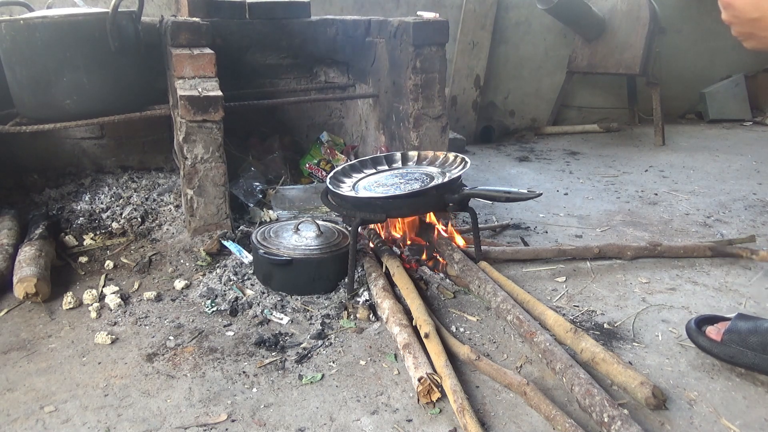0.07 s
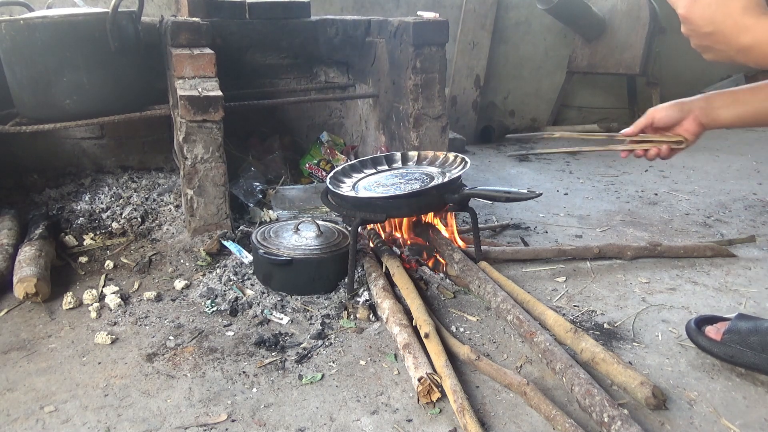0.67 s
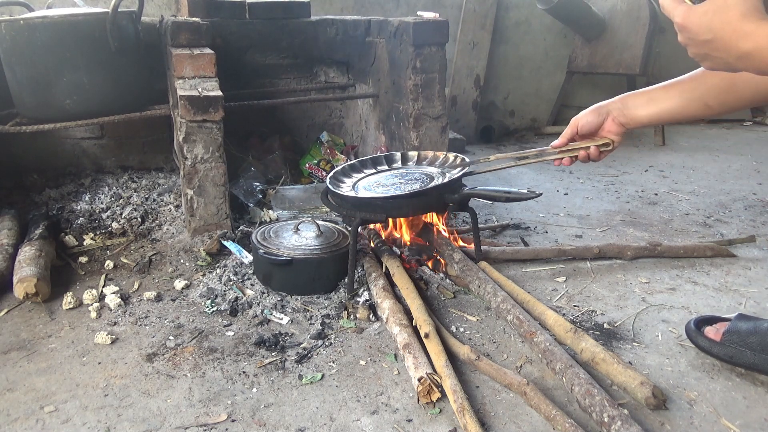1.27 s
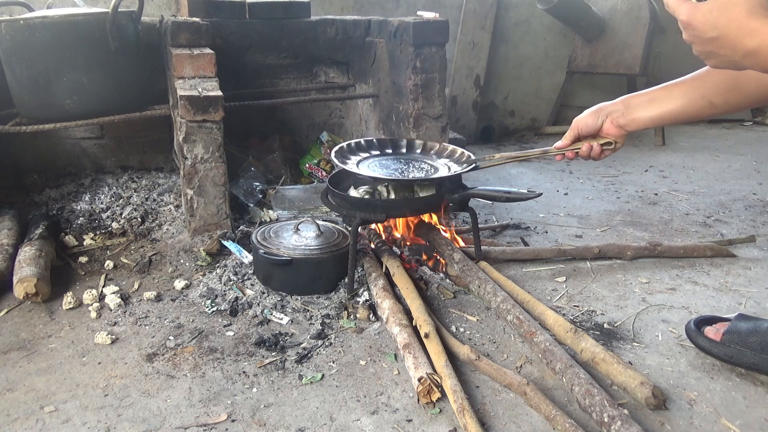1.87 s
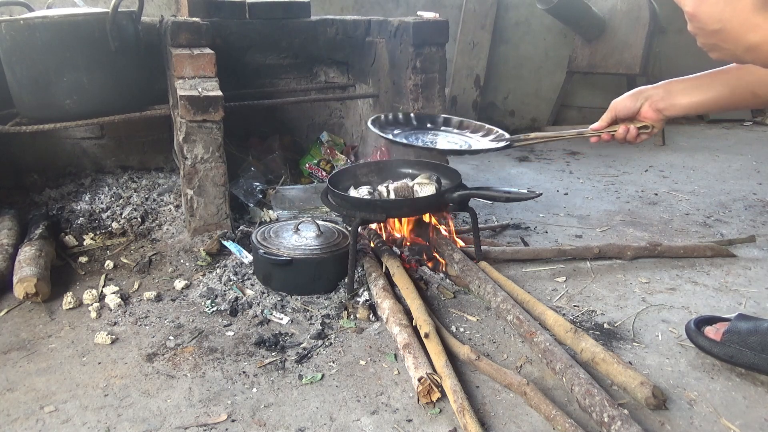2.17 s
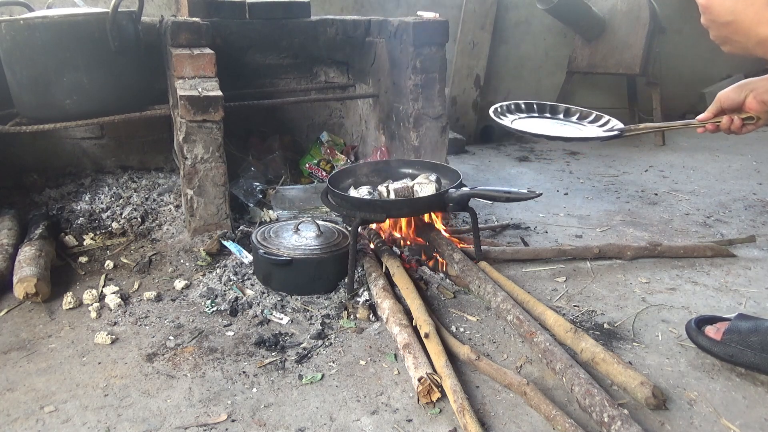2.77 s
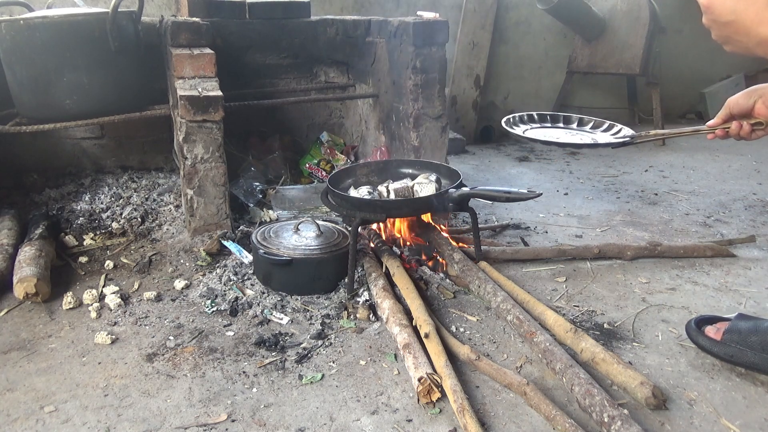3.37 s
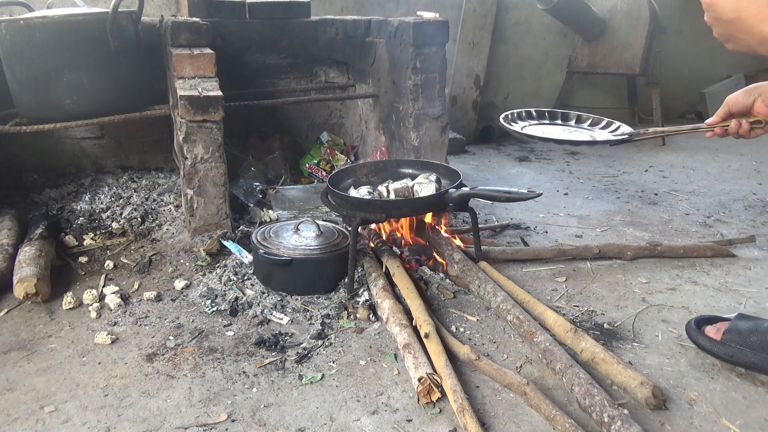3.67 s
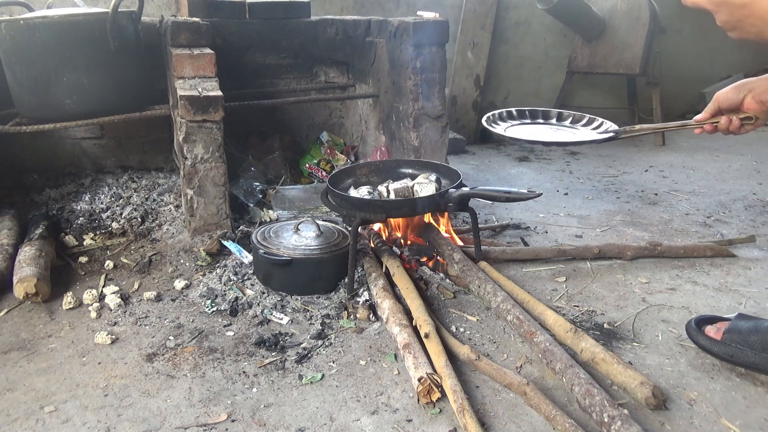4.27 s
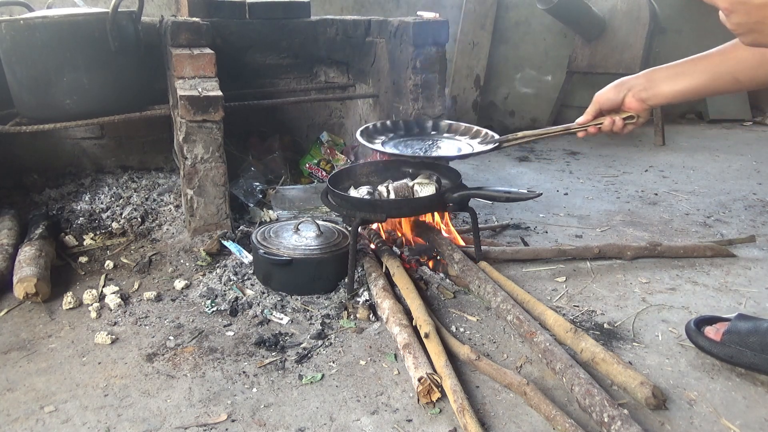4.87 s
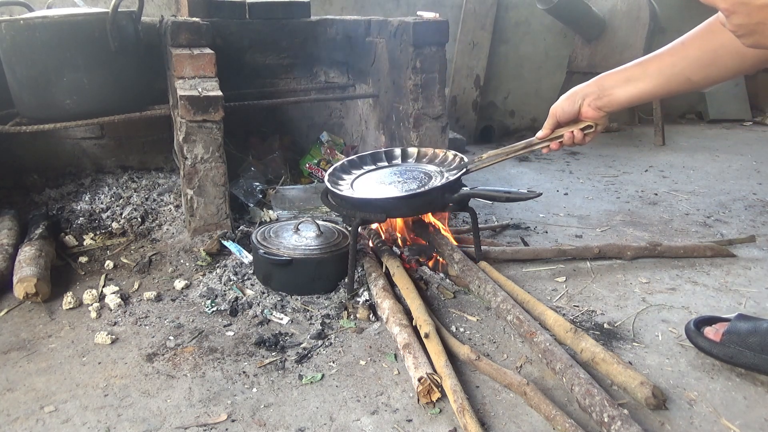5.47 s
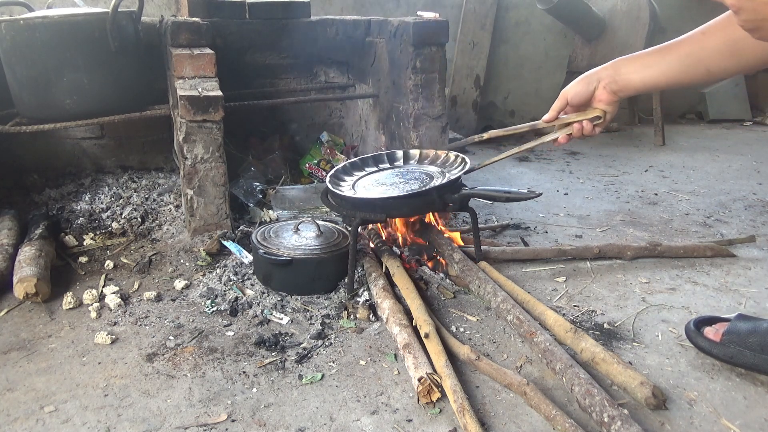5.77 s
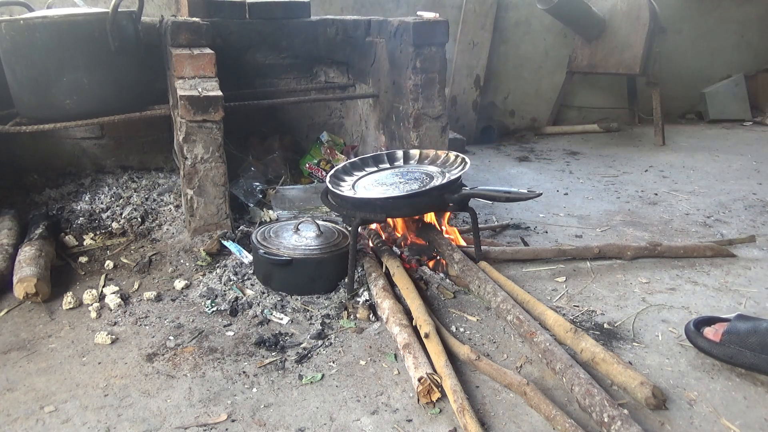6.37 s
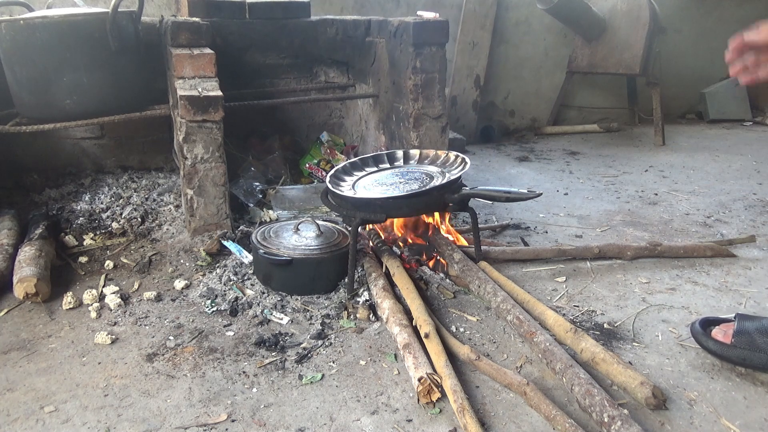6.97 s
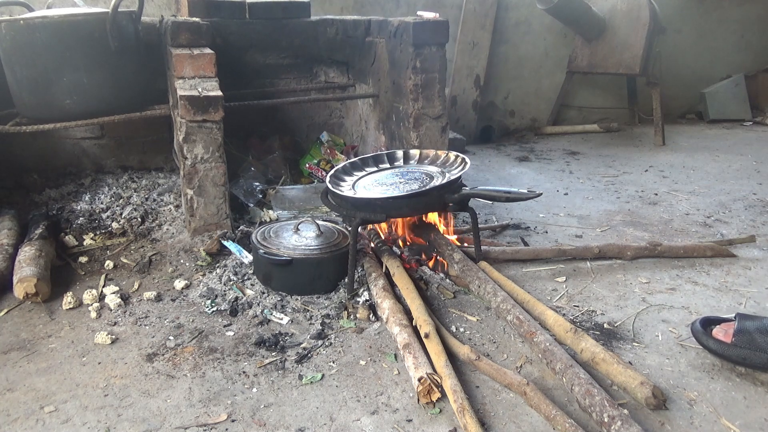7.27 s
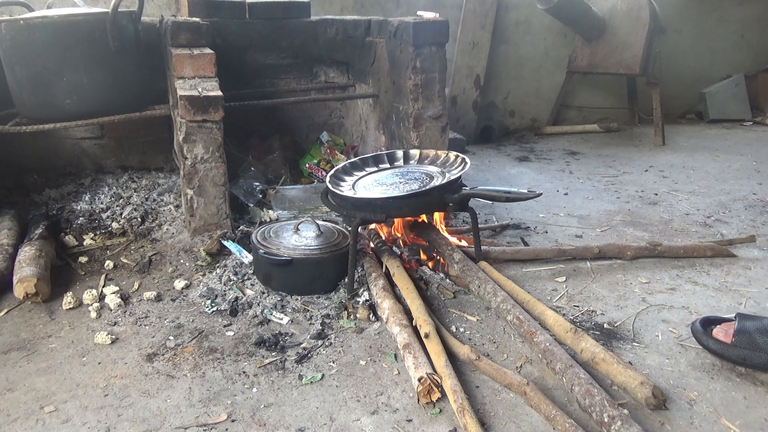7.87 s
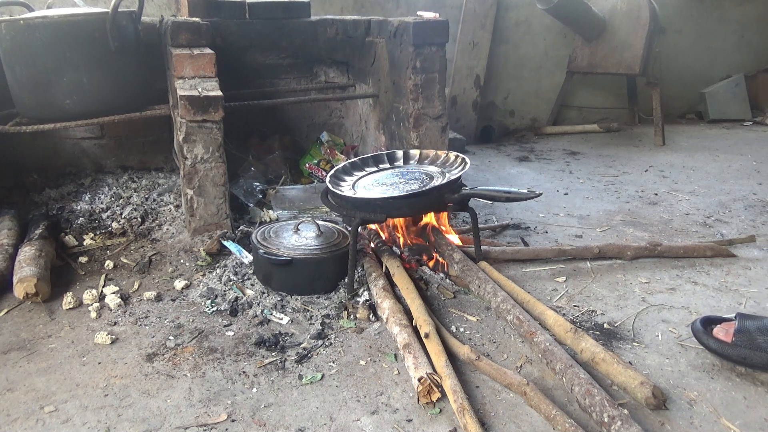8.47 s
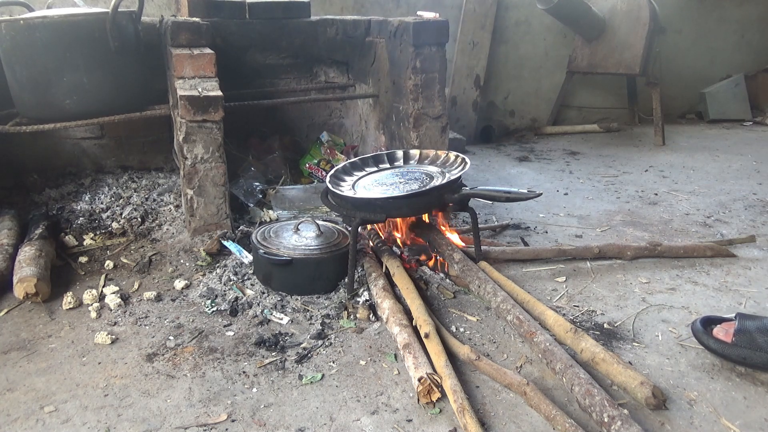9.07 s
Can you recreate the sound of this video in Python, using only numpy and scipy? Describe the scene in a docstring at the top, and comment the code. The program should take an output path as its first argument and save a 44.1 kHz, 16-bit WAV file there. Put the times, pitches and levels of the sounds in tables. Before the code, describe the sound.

In a yard, a bright, steady frying hiss is heard from nearby, with sharp spits of oil and the faint murmur and snaps of burning wood. The sizzle opens up as the pan is uncovered, then eases and turns hollow when the enamel lid lands with a couple of ringing clanks. Wooden tongs drop to the ground, and soft knocks and thuds follow while the frying continues.

```python
"""Food fries in a pan: steam bubbles burst and ring, water drops spit in the oil. Tongs lift the enamel
plate that serves as a lid and the sizzle opens up; the plate clanks back and the hiss rings again in the
hollow beneath it. The wooden tongs clatter to the ground. The wood fire under the pan murmurs and snaps.
Dull knocks and thuds nearby, faint drones far off, a short echo from the yard walls."""
import sys
import numpy as np
from scipy import signal
from scipy.fft import rfft, irfft, next_fast_len
from scipy.io import wavfile
from scipy.ndimage import map_coordinates

SR = 44100
rng = np.random.default_rng(int(sys.argv[2]) if len(sys.argv) > 2 else 0)


def int16_out(signal):
    """Quantize to a 16-bit WAV file."""
    q = np.round(np.clip(np.atleast_2d(signal).T, -1, 1) * 32767)
    wavfile.write(sys.argv[1], SR, q.astype(np.int16))


N = 407043
TIME_S = np.arange(N) / SR
FFT_SIZE = next_fast_len(N + SR)
GRID_HZ = np.fft.rfftfreq(FFT_SIZE, 1 / SR)
TOP_HZ = 15780

# Yard decay (frequency [Hz], t60 [s])
YARD_DECAY = [(200, 0.28), (2000, 0.083), (10000, 0.022)]
# Echo colour (frequency [Hz], gain [dB])
ECHO_SPECTRUM = [(30, -33), (120, -24.5), (300, -15), (1000, -7.5), (2000, -11.5), (6000, -19.5),
                 (10000, -12.5), (12000, -33.5)]
# Far drones (start [s], end [s], frequency [Hz], width [Hz], level [dB])
DRONES = [(-1, 10, 137.2, 20, -57.5), (-1, 10, 104, 4.8, -61), (-1, 10, 381, 8.3, -61),
          (1.37, 2.15, 104, 6, -54), (1.2, 1.93, 762, 36, -52)]
# Soft thuds (time [s], level [dB], frequency [Hz], length [s])
THUDS = [(.76, -44.5, 191, 0.09), (3.329, -44, 430, 0.073), (5.08, -47.5, 190, 0.14),
         (6.707, -44, 233, 0.085), (7.219, -35.5, 132, 0.051), (7.225, -43, 236, 0.081),
         (7.25, -45, 101, .06)]
# Wood impacts: nearby knocks, dropped tongs (time [s], level [dB], t60 [s])
KNOCKS = [(3.168, -34, 0.15), (6.74, -43, 0.37), (7.669, -30, 0.17), (7.683, -30, 0.24),
          (8.11, -34.5, 0.22)]
TONG_HITS = [(6.673, -19, 0.08), (6.685, -17.5, 0.16), (6.702, -19.5, 0.098), (6.716, -23.5, 0.42),
             (6.7935, -20.5, 0.15)]
# Spectra: knocked wood, tongs, flames, scraped rim (frequency [Hz], relative density [dB])
KNOCK_SPECTRUM = [(40, -40), (100, -21), (200, -7), (480, -6), (670, 3.5), (880, -10.5), (1100, 0),
                  (1350, -13), (1650, -3), (2700, -13), (3550, -9), (4500, -26), (9000, -34)]
TONG_SPECTRUM = [(150, -27), (700, -18), (2200, -10.5), (3000, -2), (3600, -6.5), (4500, 1), (6000, -4),
                 (8000, -5), (14000, -34)]
FLAME_SPECTRUM = [(20, -27), (50, -9), (70, -7), (105, -9), (135, -8.5), (165, -0.5), (230, -0.5), (400, 1),
                  (700, 1), (1100, -5), (2500, -7), (8000, -59)]
RIM_SPECTRUM = [(50, -40), (150, -18), (400, -21), (1000, -1), (2000, 10), (3800, 2), (5200, 12.5),
                (7000, -11), (14000, -25)]
# Firewood snaps (time [s], level [dB], frequency [Hz], width [Hz], t60 [s])
SNAPS = [(2.164, -16, 3880, 3000, 0.025), (3.165, -23, 2300, 3200, 0.14), (3.476, -17.5, 4970, 2000, 0.036),
         (3.598, -20, 3600, 2500, 0.075), (3.699, -19, 4000, 1500, 0.13), (4.495, -22, 2110, 1000, 0.027),
         (6.635, -22, 1810, 500, 0.024), (8.651, -26, 1840, 450, .04)]
# Lid landing and rocking to rest (time [s], ring level [dB], scrape level [dB])
LID_CONTACTS = [(5.205, -26, -20), (5.217, -25, -27), (5.228, -26, -27), (5.29, -40, -42),
                (5.488, -27, -22.5), (5.497, -31, -38), (5.544, -40, -37)]
# Enamel plate modes (frequency [Hz], relative level [dB], t60 [s])
LID_MODES = [(338, -10, 0.15), (370, -15, 0.2), (696, -3.5, 0.15), (736, -1, 0.23), (1037, 1.5, 0.21),
             (1136, -8.5, 0.14), (1283, -6, 0.09), (1670, 4, 0.11), (1731, -7, 0.2), (2088, -2, 0.22),
             (2830, -5, 0.11), (3275, -8, 0.34), (4700, -17, .11), (4915, -1, 0.14)]
# Loudest oil spits (time [s], level [dB], frequency [Hz], width [Hz])
SPITS = [(2.258, -10, 9000, 4000), (2.934, -11, 9000, 4000), (4.863, -10.5, 9400, 1300),
         (5.792, -13, 5800, 1600), (5.914, -13, 10100, 1200), (6.067, -14, 5800, 1200),
         (6.151, -12.5, 8400, 3500), (7.221, -12, 10000, 900), (7.876, -13, 9800, 1500),
         (7.907, -15.5, 9000, 2500), (8.449, -14, 9800, 1200), (8.520, -14.5, 6300, 1600)]
# Sizzle swells as the lid lifts and before it lands, then eases slightly (time [s], level change [dB])
SIZZLE_SHIFTS = [(1.72, 1.14), (4.74, 1.5), (5.68, -0.23)]
# Sizzle spectra, lid off and on (frequency [Hz], relative density [dB])
OPEN_SPECTRUM = [(200, -44), (900, -23), (1400, -13.5), (2050, -9), (2650, -11), (3400, -7), (4600, -7.5),
                 (5700, -2), (7000, -5), (8200, -4.5), (9200, 0.5), (10000, -0.5), (11000, -8),
                 (12500, -14), (16000, -17.5)]
COVERED_SPECTRUM = [(200, -29.5), (900, -23.5), (1800, -14.5), (2750, -17.5), (4400, -15.5), (5200, -9.5),
                    (5850, -3.5), (6850, -6.5), (7750, -1.5), (8550, -6), (9300, -0.6), (10100, 0),
                    (11000, -7.5), (12400, -14.5), (16000, -19.5)]
# Air modes under the lid, per seating (frequency [Hz], width [Hz], relative level [dB])
FIRST_AIR_MODES = [(714, 100, -14), (1220, 190, -12), (1907, 150, -5), (2400, 73, -7.5), (3200, 120, -10),
                   (3760, 210, -9.5), (4230, 160, -10.5), (4960, 160, -9), (6000, 200, -7),
                   (7790, 360, -8.5)]
LANDED_AIR_MODES = [(673, 85, -10), (1060, 62, -8), (1676, 110, -5), (2110, 250, -7), (2680, 50, -10.5),
                    (3070, 55, -8), (3840, 170, -8.5), (5600, 430, -0.5), (9200, 220, -2)]
SETTLED_AIR_MODES = [(705, 58, -9.5), (1046, 23, -11), (1174, 69, -11), (1835, 265, -8), (2284, 54, -4.5),
                     (3090, 160, -13.5), (3560, 76, -7), (4070, 80, -6.5), (5800, 430, -2),
                     (7700, 160, -9.5)]

WEDGE_S, LIFT_S, LID_AWAY_S, LAND_S, SETTLE_S = 0.86, 1.69, 3.5, 5.23, 6.75  # lid timeline
TREBLE_TAU_S, LOW_TAU_S = 0.11, 0.23  # gap opening, per band


def amp(db):
    """Decibels to gain."""
    return 10 ** (np.asarray(db) / 20)


def unit(x):
    """Scale to rms 1."""
    return x / np.sqrt(np.mean(x ** 2) + 1e-20)


def along(points, hz=GRID_HZ):
    """Interpolate (frequency [Hz], value) points on a log axis."""
    knots_hz, values = np.transpose(points)
    return np.interp(np.log(hz + 1), np.log(knots_hz + 1), values)


def wobble(rate_hz):
    """Smooth random curve, rate_hz knots a second."""
    return map_coordinates(rng.standard_normal(int(N * rate_hz / SR) + 4), [TIME_S * rate_hz])


def swell(start_s, rise_s, tau_s):
    """Linear rise to 1, exponential decay."""
    age_s = TIME_S - start_s
    return np.clip(age_s / rise_s, 0, 1) * np.exp(-np.maximum(age_s - rise_s, 0) / tau_s)


def resonance(centre_hz, width_hz, hz=GRID_HZ):
    """Resonator gain, 1 at the centre."""
    return np.abs(hz * width_hz / (centre_hz ** 2 - hz ** 2 + 1j * hz * width_hz))


def filtered(x, response):
    """Apply a frequency response given on GRID_HZ."""
    return irfft(rfft(x, FFT_SIZE) * response, FFT_SIZE)[..., :N]


def coloured(x, gain):
    """Minimum-phase filter, gain on GRID_HZ."""
    cepstrum = irfft(np.log(np.maximum(gain, 1e-6)), FFT_SIZE)
    cepstrum[1:FFT_SIZE // 2] *= 2
    cepstrum[FFT_SIZE // 2 + 1:] = 0
    return filtered(x, np.exp(rfft(cepstrum)))


def burst(gain_at, t60_s, attack_s=0.0003):
    """0.5 s of decaying noise with spectrum gain_at(hz)."""
    t = TIME_S[:SR // 2]
    gain = gain_at(np.fft.rfftfreq(len(t), 1 / SR))
    noise = irfft(rfft(rng.standard_normal(len(t))) * gain, len(t))
    return unit(noise) * amp(-60 * t / t60_s) * (1 - np.exp(-t / attack_s))


def band_burst(centre_hz, width_hz, t60_s):
    """Noise burst through two equal resonators."""
    return burst(lambda hz: resonance(centre_hz, width_hz, hz) ** 2, t60_s)


def add(track, time_s, sound):
    """Mix a sound in at time_s."""
    part = track[round(time_s * SR):]
    part[:len(sound)] += sound[:len(part)]


def yard_echo(x, blocks=32, delay_s=0.004):
    """Diffuse wall echo, shorter in the treble; its pattern drifts as the bubbles move about."""
    out, hop = np.zeros(N), N // blocks
    for start in range(-hop, N, hop):
        hz, _, noise = signal.stft(rng.standard_normal(SR // 3), SR, nperseg=256)
        t = np.arange(noise.shape[1]) * 128 / SR
        t60_s = along(YARD_DECAY, hz)[:, None]
        tail = signal.istft(noise * amp(-60 * t / t60_s) / np.sqrt(t60_s), SR, nperseg=256)[1]
        span = np.arange(max(start, 0), min(start + 2 * hop, N))
        block = x[span] * np.sin(np.pi * (span - start) / (2 * hop))
        add(out, span[0] / SR + delay_s, signal.fftconvolve(block, tail / np.linalg.norm(tail)))
    return out


def drones(fade_s=0.15):
    """Faint, wavering far tones: narrow noise bands."""
    out = np.zeros(N)
    for start_s, end_s, hz, width_hz, db in DRONES:
        tone = unit(filtered(rng.standard_normal(FFT_SIZE), resonance(hz, width_hz) ** 2))
        gate = np.clip(np.minimum(TIME_S - start_s, end_s - TIME_S) / fade_s, 0, 1)
        out += amp(db) * tone * gate
    return out


def thuds(sag=0.15):
    """Soft, heavy bumps: low cycles that swell and sag in pitch."""
    out = np.zeros(N)
    for time_s, db, hz, length_s in THUDS:
        t = TIME_S[:int(length_s * SR)]
        cycles = hz * t * (1 + sag * (1 - t / length_s) / 2)
        add(out, time_s, amp(db) * np.sqrt(2) * np.hanning(len(t)) * np.sin(2 * np.pi * cycles))
    return out


def wood_hits(hits, spectrum):
    """Struck wood: dense, fast-decaying resonances."""
    out = np.zeros(N)
    for time_s, db, t60_s in hits:
        add(out, time_s, amp(db) * burst(lambda hz: amp(along(spectrum, hz)), t60_s))
    return out


def crackle(count=22, level_db=-27, spread_db=1, centre_hz=3600):
    """Burning wood ticks faintly at random."""
    out = np.zeros(N)
    for when, (size, pitch) in zip(rng.random(count), rng.standard_normal((count, 2))):
        tick = band_burst(centre_hz * np.exp(0.3 * pitch), width_hz=2200, t60_s=0.022)
        add(out, when * N / SR, amp(level_db + spread_db * min(size, 2)) * tick)
    return out


def fire(level_db=-45.5, sway_db=1.1, flicker_db=0.8):
    """Flames murmur unevenly; the wood snaps."""
    flame_db = level_db + sway_db * wobble(4.3) + flicker_db * wobble(14)
    out = amp(flame_db) * unit(coloured(rng.standard_normal(N), amp(along(FLAME_SPECTRUM))))
    for time_s, db, hz, width_hz, t60_s in SNAPS:
        add(out, time_s, amp(db) * band_burst(hz, width_hz, t60_s))
    return out


def lid_clanks(attack_s=0.0012, roughness=0.45):
    """Each contact scrapes the rim, rings the chattering plate and shakes the pan's iron stand."""
    out, t = np.zeros(N), TIME_S[:SR // 2]
    onset = 1 - np.exp(-t / attack_s)
    for time_s, ring_db, scrape_db in LID_CONTACTS:
        steps = rng.standard_normal((len(LID_MODES), len(t)))
        chatter_cycles = np.cumsum(steps, axis=1) * roughness * np.sqrt(10 / SR)
        ring = sum(amp(db - 60 * t / t60_s) * np.sin(2 * np.pi * (hz * t + drift + rng.random()))
                   for (hz, db, t60_s), drift in zip(LID_MODES, chatter_cycles))
        stand = amp(-15) * band_burst(centre_hz=350, width_hz=350, t60_s=0.87)
        scrape = burst(lambda hz: amp(along(RIM_SPECTRUM, hz)), t60_s=0.13)
        add(out, time_s, amp(ring_db) * (ring + stand) * onset + amp(scrape_db) * scrape)
    return out


def spits(stray_count=18, stray_db=-20, spread_db=1.5, stray_hz=9700, stray_width_hz=1500):
    """Water drops explode in the oil; lesser strays follow once the wet lid is back."""
    out, strays = np.zeros(N), []
    for when, (size, pitch) in zip(rng.random(stray_count), rng.standard_normal((stray_count, 2))):
        time_s = LAND_S + when * (N / SR - LAND_S)
        strays.append((time_s, stray_db + spread_db * size, stray_hz * np.exp(0.06 * pitch), stray_width_hz))
    for time_s, db, hz, width_hz in list(SPITS) + strays:
        add(out, time_s, amp(db) * band_burst(hz, width_hz, t60_s=0.012))
    return out


def opening(tau_s):
    """Open share of the pan (0-1): grows after the lift, shrinks toward the landing."""
    swing_s = np.maximum(np.minimum(TIME_S - LIFT_S, LAND_S - TIME_S), 0)
    return 1 - np.exp(-swing_s / tau_s)


def frying_db(simmer_db=-26, uncovered_gain_db=2.5):
    """Steady simmer, louder uncovered, with two swells and a slight easing."""
    shifts_db = sum(db * swell(time_s, rise_s=0.18, tau_s=2.6) for time_s, db in SIZZLE_SHIFTS)
    return simmer_db + uncovered_gain_db * opening(TREBLE_TAU_S) + shifts_db


def ringing_bubbles(count, centre_hz, log_spread, t60_s, gain_db, spread_db):
    """Larger bubbles ring briefly, each at its own pitch."""
    out, t = np.zeros(N), TIME_S[:SR // 50]
    for when, (size, pitch) in zip(rng.random(count), rng.standard_normal((count, 2))):
        hz = min(centre_hz * np.exp(log_spread * pitch), TOP_HZ)
        ring = np.sin(2 * np.pi * hz * t) * amp(-60 * t / t60_s)
        add(out, when * N / SR, amp(gain_db + spread_db * min(size, 2)) * ring)
    return out * amp(frying_db())


def steam_pops(band_rate_hz, spread_db, cap_db, hiss_db, flutter_db, bands=5):
    """Steam bubbles burst over a hiss of tiny ones; each size class has its own band and flurries."""
    out = np.zeros(N)
    for centre_hz in np.linspace(0, TOP_HZ, bands):
        sizes = amp(np.minimum(spread_db * rng.standard_normal(N), cap_db)) * rng.choice([-1, 1], N)
        pops = unit(sizes * (rng.random(N) < band_rate_hz / SR))
        flurries = amp(flutter_db * (wobble(45) + wobble(260)))
        hiss = amp(hiss_db) * rng.standard_normal(N)
        band = np.sqrt(np.maximum(1 - np.abs(GRID_HZ - centre_hz) * (bands - 1) / TOP_HZ, 0))
        out += filtered((pops + hiss) * flurries, band)
    return unit(out)


def under_lid(pops, air_modes):
    """The hollow under the lid adds its air modes to the muffled sizzle."""
    mode_power = sum((amp(db) * resonance(hz, width_hz)) ** 2 for hz, width_hz, db in air_modes)
    return unit(coloured(pops, np.sqrt(amp(along(COVERED_SPECTRUM)) ** 2 + mode_power)))


def through_gap(pops, split_hz=5040, ajar_share=0.1):
    """Sizzle escaping past the lid: lows leak as tongs wedge it ajar; on the lift, treble opens faster."""
    low = filtered(pops, 1 / (1 + (GRID_HZ / split_hz) ** 8))
    wedged = ajar_share * np.clip((TIME_S - WEDGE_S) / (LIFT_S - WEDGE_S), 0, 1) * (TIME_S < LID_AWAY_S)
    low_share = np.maximum(opening(LOW_TAU_S), wedged)
    return np.sqrt(opening(TREBLE_TAU_S)) * (pops - low) + np.sqrt(low_share) * low


def sizzle(sway_db=0.18, settling_s=0.1):
    """Frying via free path and hollow: dense, spiky pops at first; sparser, more even with the lid back."""
    dense = steam_pops(band_rate_hz=2200, spread_db=2, cap_db=18, hiss_db=1.5, flutter_db=0.77)
    sparse = steam_pops(band_rate_hz=1300, spread_db=1, cap_db=5.5, hiss_db=1.5, flutter_db=0.94)
    uncovered = steam_pops(band_rate_hz=2200, spread_db=2, cap_db=17, hiss_db=-1, flutter_db=0.8)
    free = through_gap(unit(coloured(uncovered, amp(along(OPEN_SPECTRUM)))))
    settled = np.clip((TIME_S - SETTLE_S) / settling_s, 0, 1)
    reseated = (1 - settled) * under_lid(sparse, LANDED_AIR_MODES)
    reseated += settled * under_lid(sparse, SETTLED_AIR_MODES)
    hollow = np.where(TIME_S < LID_AWAY_S, under_lid(dense, FIRST_AIR_MODES), reseated)
    hollow *= np.sqrt(1 - opening(TREBLE_TAU_S))
    return amp(frying_db() + sway_db * wobble(7.5)) * (amp(2) * free + amp(0.72) * hollow)


def scene():
    """All sources centred; only the echo differs left to right."""
    pan = ringing_bubbles(600, centre_hz=10020, log_spread=0.045, t60_s=0.014, gain_db=-1.5, spread_db=6)
    pan += ringing_bubbles(350, centre_hz=6130, log_spread=0.055, t60_s=0.022, gain_db=-2.5, spread_db=3.5)
    pan += sizzle() + spits() + lid_clanks()
    direct = pan + fire() + crackle() + wood_hits(TONG_HITS, TONG_SPECTRUM)
    direct += wood_hits(KNOCKS, KNOCK_SPECTRUM) + thuds() + drones()
    echoes = np.array([yard_echo(direct), yard_echo(direct)])
    mid_echo, side = coloured(echoes, amp(along(ECHO_SPECTRUM)))
    mid = amp(-1.06) * (direct + amp(1.5) * mid_echo)
    dip_db = -7 * swell(start_s=5.917, rise_s=0.003, tau_s=0.016)  # brief dip after one sharp spit
    return np.array([mid + side, mid - side]) * amp(dip_db)


def record(dry):
    """Brick-wall low-pass at TOP_HZ."""
    return filtered(dry, GRID_HZ < TOP_HZ)


dry = scene()
out = record(dry)
int16_out(out)
```